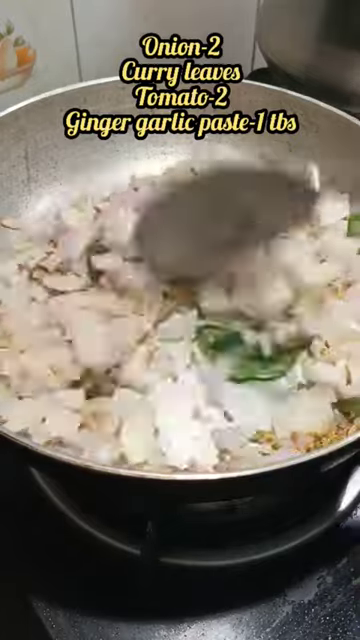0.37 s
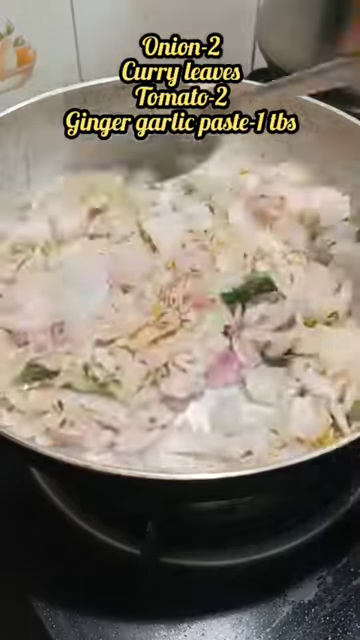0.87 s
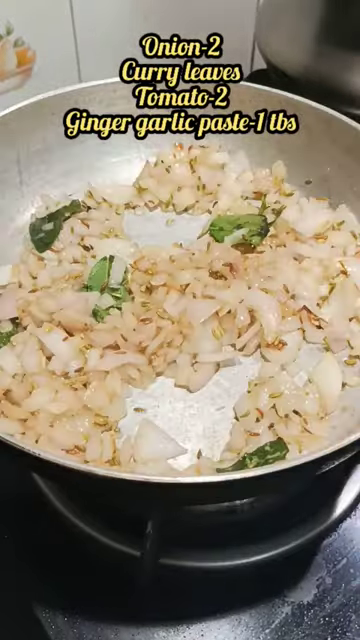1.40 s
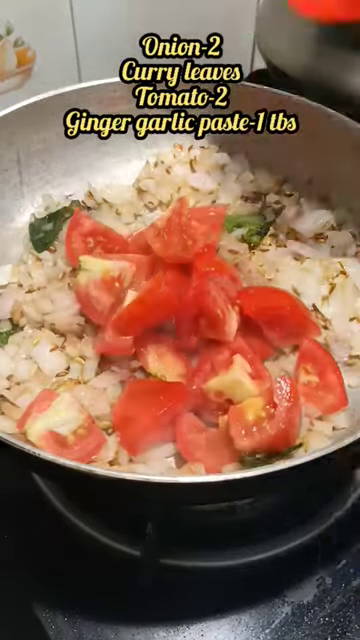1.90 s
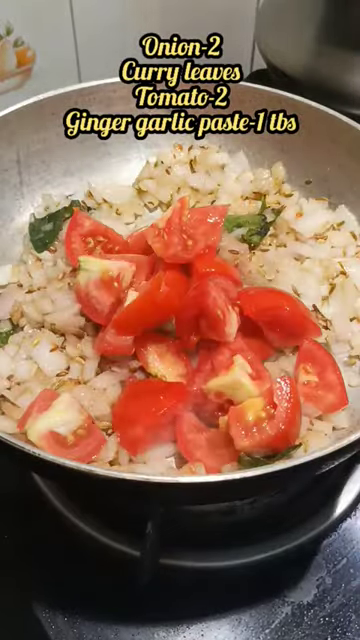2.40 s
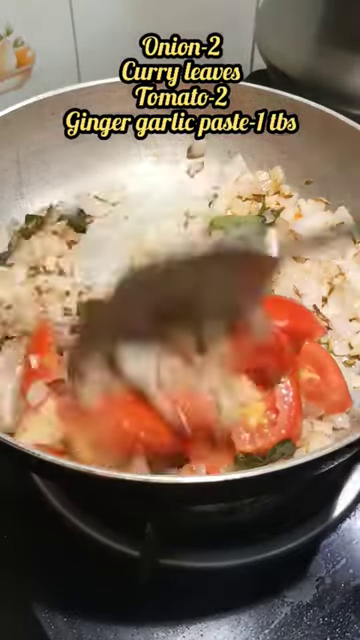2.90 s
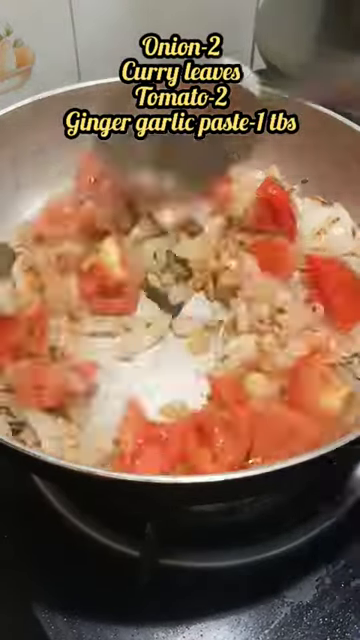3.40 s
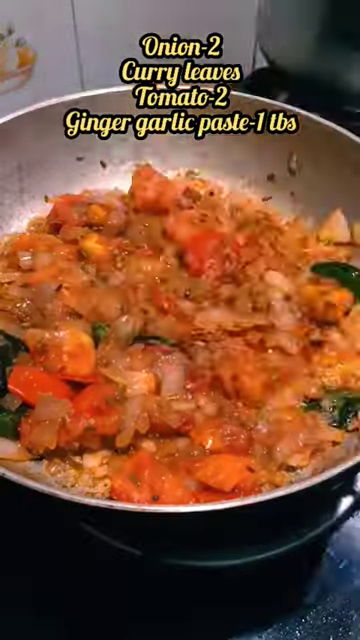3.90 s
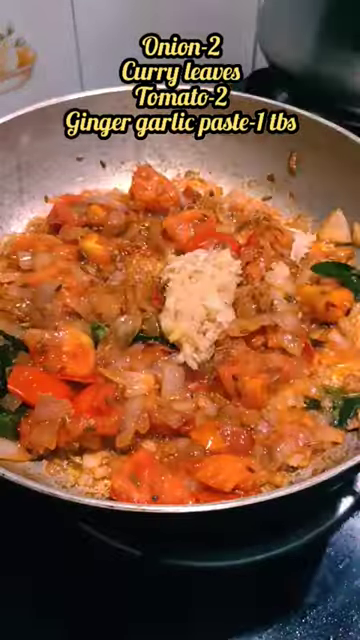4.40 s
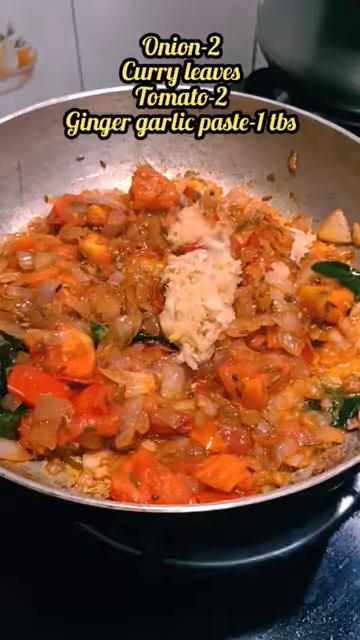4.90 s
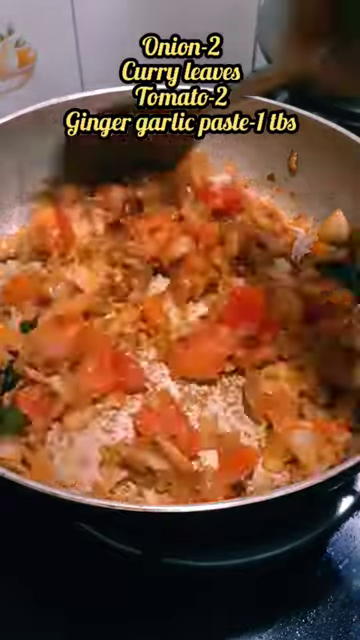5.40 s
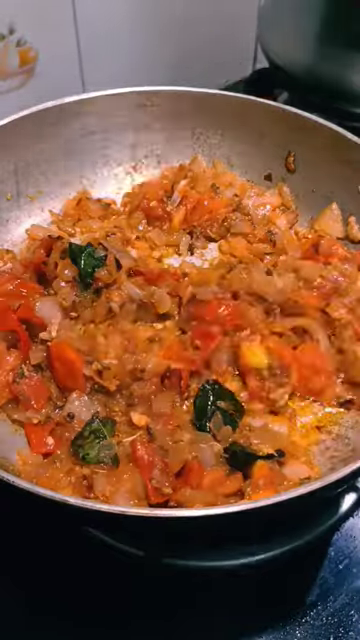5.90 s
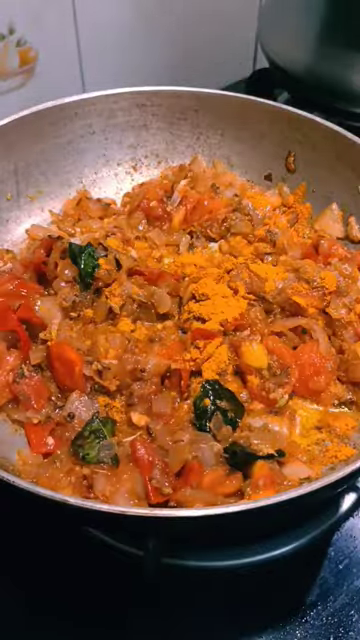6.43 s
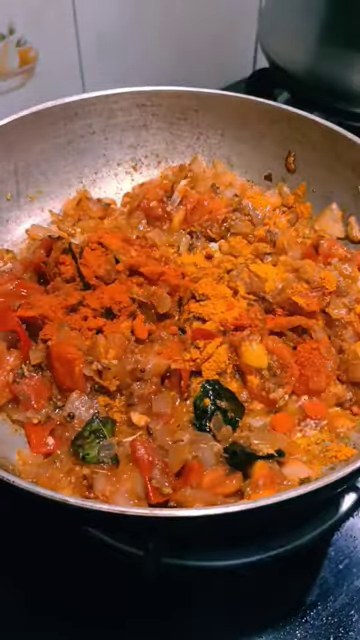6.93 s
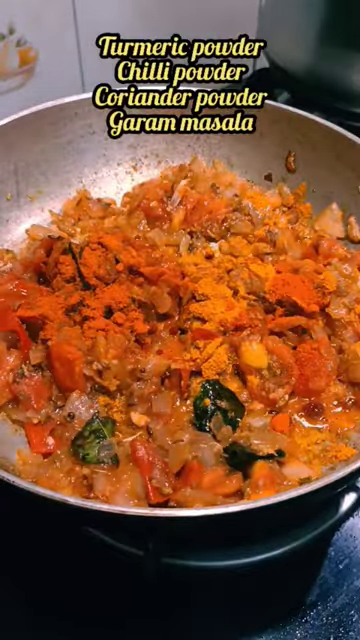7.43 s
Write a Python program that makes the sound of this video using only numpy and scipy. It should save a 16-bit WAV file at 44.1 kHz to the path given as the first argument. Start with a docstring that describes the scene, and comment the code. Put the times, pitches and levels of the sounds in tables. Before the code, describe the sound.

A ladle knocks and scrapes a steel pan of frying onions over a lively sizzle that jumps abruptly between loud and quiet stages.

```python
"""Onions and tomatoes frying in a steel pan

Steam bubbles burst in the oil as a dense sizzle of shaped noise bursts, with lone decaying-sine pops and spits.
A ladle knocks, scrapes and stirs the pan, waking modes that hold and then stop abruptly; a small spoon clinks
in bright modes and steam whistles faintly in a gliding sine. Burner and kitchen rumble as low noise. The sizzle
jumps abruptly in fierceness several times; the sound is in stereo, and twice its level dips briefly."""
import sys
import numpy as np
from scipy import signal
from scipy.fft import rfft, irfft, next_fast_len
from scipy.io import wavfile
from scipy.ndimage import uniform_filter1d

SR = 44100
rng = np.random.default_rng(int(sys.argv[2]) if len(sys.argv) > 2 else 0)


def convert_level_to_amplitude(level_db):
    """Map a level in decibels to its linear amplitude factor."""
    exponent = np.asarray(level_db, float) / 20
    return 10 ** exponent


def dump(signal):
    """Clip the signal to [-1, 1] and save it as 16-bit WAV at the path in sys.argv[1]."""
    limited = np.clip(np.atleast_2d(signal).T, -1, 1)
    pcm = np.round(limited * 32767).astype(np.int16)
    wavfile.write(sys.argv[1], SR, pcm)


N = 332955
SIZE = next_fast_len(N + 4096)  # transform length, samples
HZ = np.arange(SIZE // 2 + 1) * SR / SIZE + 1e-3  # kept above zero for the logarithm

# The pan's modes.
# Each row: frequency in Hz, level in dB, time to fall 60 dB in seconds (shorter after a quick contact).
PAN_MODES = [(165, -12.5, 0.021), (270, -5, 0.051), (314, 4, .018), (384, -2.5, 0.027), (529, -8, 0.021),
             (604, -0.5, 0.025), (689, 3, 0.025), (760, -1.5, 0.027), (935, 1, 0.02), (1010, 7, .02),
             (1083, -0.5, .021), (1224, 0.5, .028), (1377, -5.5, 0.02), (1540, 4.5, 0.026),
             (1760, 8.5, 0.016), (2177, 4, 0.026), (2373, 4, 0.013), (2600, 6.5, 0.023)]
EDGE_FROM_HZ = 1150  # the pan's high edge rings lie above this


def read(table, col=1):
    """Spectral interpolation: a table column along a log-frequency axis."""
    return np.interp(np.log(HZ), np.log([r[0] for r in table]), [r[col] for r in table])


def colour(x, table):
    """Linear filtering: two signals take on a spectrum and a common rms of 1."""
    y = irfft(rfft(x, SIZE) * convert_level_to_amplitude(read(table)), SIZE)[:, :N]
    return y / np.sqrt(np.mean(y ** 2))


def walk(rate):
    """Random modulation: independent levels held for 1 / rate seconds, then smoothed twice."""
    k = int(SR / rate)
    held = np.repeat(rng.standard_normal(N // k + 1), k)
    return 0.93 * uniform_filter1d(uniform_filter1d(held, k), k)[:N]


def add(track, s, sound):
    """Superposition: a sound joins a track at s seconds."""
    i = int(s * SR)
    track[:, i:i + sound.shape[-1]] += sound[..., :N - i]


def stage(col):
    """Piecewise-constant bubble size: bigger bubbles in wetter food make a duller fizz."""
    # Each row: end in seconds, tilt in dB per octave about 6 kHz, extra wet crackle in dB.
    stages = [(1.3, -2.5, 0.5), (1.945, 0, 0.2), (2.98, -1, 1.1), (3.89, -1.5, 1), (5.1, -1.1, 0.6),
              (5.7, -1.1, 0.5), (7.55, 0.6, 0.2)]
    rows = np.array(stages)
    row = np.searchsorted(rows[:, 0], np.arange(N) / SR)
    return rows[np.minimum(row, len(rows) - 1), col]


def flicker(x, own_db):
    """Band-wise modulation: half-octave bands flicker fast and independently, and tilt with the stage."""
    bands_hz = 2000 * 2 ** np.arange(0, 3.1, .5)
    lean = stage(col=1)
    spectrum = rfft(x, SIZE)
    octave = np.log2(np.clip(HZ, bands_hz[0], bands_hz[-1]))
    out = 0
    for hz in bands_hz:
        share = np.clip(1 - 2 * abs(octave - np.log2(hz)), 0, 1)  # neighbours overlap and sum to one
        band = irfft(spectrum * share, SIZE)[:, :N]
        out = out + convert_level_to_amplitude(own_db * walk(45) + lean * np.log2(hz / 6000)) * band
    return out


def bubbles(spread_db, most_db, burst_ms, patchy_db, table):
    """Shot noise: bursts of very unequal size reach both tracks, each with its own fine detail."""
    hold = max(int(burst_ms * SR / 1000), 1)
    draws = np.repeat(rng.exponential(size=N), hold)[:N]
    size = convert_level_to_amplitude(np.minimum(spread_db * draws, most_db))
    patches = convert_level_to_amplitude(patchy_db * walk(60) + 0.73 * patchy_db * walk(35))
    return colour(size * patches * rng.standard_normal((2, N)), table)


def sizzle():
    """Event density: small bubbles fizz high, wet ones crackle lower, and fierce frying blends single bursts."""
    # Spectra of fizz and crackle. Each row: frequency in Hz, relative density in dB per Hz.
    fizz_spectrum = [(300, -39), (1500, -16), (3200, -2.5), (5500, -5.5), (8500, -5), (11000, 1),
                     (13000, -5.5), (15000, -9.5), (16000, -45)]
    crackle_spectrum = [(150, -9), (500, -16), (1000, 1), (1300, -1.5), (1750, 3.5), (2250, 0),
                        (3200, -0.5), (5000, -6.5), (9000, -24), (16000, -35)]
    # Fierceness; it also swells when the food is turned. Each row: time in seconds, fine fizz level in dB.
    fierceness = [(0, -24.5), (.55, -24), (1.288, -25.5), (1.31, -32), (1.5, -35.5), (1.94, -38),
                  (1.952, -27), (2.0, -23.5), (2.08, -26.5), (2.4, -28.5), (2.48, -26), (2.95, -28),
                  (3.04, -22), (3.883, -21.5), (3.915, -39.5), (4.78, -37.5), (5.09, -39), (5.122, -38),
                  (5.134, -31.5), (5.2, -28), (5.57, -23.5), (5.696, -26.5), (5.707, -44.5), (7.55, -46)]
    middling_db = -34
    wet_db, wet_per_db = -38.5, 0.5136  # crackle under a middling fizz; dB gained for each dB of fizz
    fizz_db = np.interp(np.arange(N) / SR, *np.transpose(fierceness))
    over_db = fizz_db - middling_db
    fizz = bubbles(spread_db=2.0 - 0.024 * over_db, most_db=11.5 - 0.53 * over_db, burst_ms=.25,
                   patchy_db=1.26, table=fizz_spectrum)
    wet = bubbles(spread_db=1.5, most_db=2.5, burst_ms=.8, patchy_db=1.5, table=crackle_spectrum)
    wet_gain = convert_level_to_amplitude(wet_db + wet_per_db * over_db + stage(col=2))
    return convert_level_to_amplitude(fizz_db) * flicker(fizz, own_db=1.73) + wet_gain * wet


def rumble():
    """Low-frequency random noise: burner and kitchen, lumpy and slowly wavering."""
    # Each row: frequency in Hz, relative density in dB per Hz.
    rumble_spectrum = [(25, -20), (70, -2), (130, -0.5), (230, 2), (300, -6.5), (600, -6), (1200, -11.5),
                       (4000, -22.5)]
    # Each row: time in seconds, level in dB.
    rumble_levels = [(0, -43.5), (1.2, -41), (2.6, -41), (3.8, -41), (4.3, -40.5), (4.9, -39.5),
                     (5.9, -41.5), (6.4, -42.5), (7.0, -43), (7.55, -42.5)]
    db = np.interp(np.arange(N) / SR, *np.transpose(rumble_levels)) + 1.2 * walk(14) + 1.0 * walk(5.5)
    return convert_level_to_amplitude(db) * colour(rng.standard_normal((2, N)), rumble_spectrum)


def spatter():
    """Random impulses: spits of oil and low plops of sauce, each rising a little in pitch as it bursts."""
    # Each row: bursts per second, level of the smallest in dB, spread in dB, lowest and highest starting
    # pitch in Hz, cycles to fall to 1/e.
    spits = [(30, -42, 6, 7300, 13500, 2), (14, -47, 3.5, 218, 820, 2.9)]
    out, t = np.zeros((2, N)), np.arange(1500) / SR
    for rate, db, spread_db, low_hz, high_hz, cycles in spits:
        for when, size, pitch in rng.random((400, 3))[:int(rate * N / SR)]:
            turns = low_hz * (high_hz / low_hz) ** pitch * t
            rising = turns * (1 + 0.017 * np.minimum(turns, 8))
            burst = np.sin(2 * np.pi * rising) * np.exp(-turns / cycles)
            burst_db = db - spread_db * np.log(1 - .97 * size)  # few large, many small
            add(out, when * N / SR, convert_level_to_amplitude(burst_db) * burst[None])
    return out


def stirring():
    """Forced resonance: the ladle's uneven drag through the food shakes the pan's lower modes at once."""
    # Each row: start in seconds, end in seconds, level in dB.
    strokes = [(0, 1.283, -46.5), (2.938, 3.874, -43), (5.11, 5.705, -47.5)]
    fade_s, uneven_db = 0.022, 4
    t = np.arange(N) / SR
    response = sum(convert_level_to_amplitude(db) / (1 + 1j * (HZ - hz) * 2 * np.pi * t60 / np.log(1000))
                   for hz, db, t60 in PAN_MODES if hz < EDGE_FROM_HZ)
    force = convert_level_to_amplitude(uneven_db * walk(30.06)) * rng.standard_normal((2, N))
    murmur = irfft(rfft(force, SIZE) * response, SIZE)[:, :N]
    drag = sum(convert_level_to_amplitude(db) * np.clip(np.minimum(t - start, end - t) / fade_s, 0, 1) for start, end, db in strokes)
    return drag * murmur / np.sqrt(np.mean(murmur ** 2))


def scrapes():
    """Stick-slip friction: steel or food dragged along the pan gives band noise that swells and stops."""
    # Each row: start in seconds, length in seconds, level in dB, centre in Hz, width in octaves.
    drags = [(0.032, 0.055, -28, 700, 2.1), (0.179, 0.034, -31.5, 700, 1.7),
             (0.316, 0.023, -27.5, 895, 2.2), (0.563, 0.026, -35, 600, 3.5), (0.795, 0.034, -45, 400, 1.3),
             (0.841, 0.041, -34, 600, 2.2), (0.947, 0.031, -29.5, 700, 1.6), (1.15, 0.022, -28, 605, 3.3),
             (1.467, 0.055, -39.5, 800, 1.8), (1.506, 0.015, -27, 2300, 1), (1.521, 0.023, -34, 1190, 2),
             (2.036, 0.046, -39, 1720, 0.36), (2.24, .03, -45, 1600, .5), (2.38, 0.039, -37, 1620, 0.33),
             (2.493, 0.044, -34, 1720, 0.43), (2.617, .04, -36, 1650, .5), (2.181, .02, -33.5, 1090, 2.9),
             (2.533, 0.013, -33, 900, 1.6), (2.564, 0.025, -34, 1000, 1.7), (2.933, 0.016, -32, 840, 1.2),
             (3.055, .035, -40, 550, 1.4), (3.127, 0.023, -38, 317, 0.64), (3.271, 0.033, -26, 790, 1.1),
             (4.952, 0.04, -33, 2120, 0.44), (4.991, 0.023, -31, 1200, 2.1), (6.972, 0.091, -57, 400, 1.1),
             (5.215, .03, -41, 960, 0.41), (5.26, 0.037, -41, 1000, 0.46), (5.348, 0.0093, -33, 1800, 1),
             (5.505, 0.051, -34.5, 604, 1.6), (5.788, 0.21, -47, 427, 0.8)]
    uneven_db = 3.5
    out = np.zeros((2, N))
    for s, length, db, hz, octaves in drags:
        t = np.arange(int(length * SR)) / SR
        edges_hz = hz * 2 ** (np.array([-.5, .5]) * octaves)
        band = signal.butter(3, edges_hz, "band", fs=SR, output="sos")
        uneven = convert_level_to_amplitude(uneven_db * np.interp(t, np.arange(60) * 0.00425, rng.standard_normal(60)))
        grit = signal.sosfilt(band, rng.standard_normal((2, 12000)))[:, 500:500 + len(t)]  # past the onset
        grit = grit / np.sqrt(np.mean(grit ** 2))
        add(out, s, convert_level_to_amplitude(db) * np.sqrt(np.sin(np.pi * t / length)) * uneven * grit)
    return out


def hold_and_stop(t60, rise_ms):
    """Amplitude envelope: sound builds up, holds, then stops abruptly, as in time-stretched, sped-up sound."""
    t, rise = np.arange(2600) / SR, max(rise_ms, .1) / 1000
    build_up = np.sin(np.pi / 2 * np.minimum(t / rise, 1)) ** 2
    stop = np.exp(-np.log(1000) * (np.maximum(t - rise, 0) / t60) ** 2.45)
    return t, build_up * stop


def ring(hz, t60, rise_ms, rough=.5):
    """Modal vibration shaken by a chattering contact; the right channel's own part trails by a quarter cycle."""
    scatter_turns, soft_scatter_turns = .04, .35  # phase scatter of the lag; of a soft contact
    t, shape = hold_and_stop(t60, rise_ms)
    start = soft_scatter_turns * rng.random() * min(rise_ms / 3.3, 1)
    turns = start + np.array([[0], [-.25 + scatter_turns * rng.standard_normal()]])
    chatter = 1 + rough * np.interp(t, np.arange(30) * 0.00211, rng.standard_normal(30))
    return shape * chatter * np.sin(2 * np.pi * (hz * t + turns))


def ladle():
    """Modal excitation: each contact grates and wakes modes near its favoured pitch, the boom and edge rings."""
    # Ladle and pieces of food meeting the pan. Each row: start in seconds, peak in dB, pitch in Hz that
    # the struck spot favours, low boom against that pitch in dB, build-up in milliseconds.
    knocks = [(.034, -17.5, 874, -10, 3.8), (.045, -11, 760, -17, 4.7), (.058, -11.5, 960, -17, 5.6),
              (.068, -20, 1010, -17, 7.7), (0.181, -18, 1050, -1, 3.5), (.195, -21, 384, -12, 3.1),
              (0.269, -19.5, 896, -15, 6.7), (0.283, -19.5, 1020, -2, 5), (.317, -10, 1010, -13, 2.7),
              (.318, -15, 1700, -24, 2), (.323, -13, 1780, -22, 3.2), (.329, -18, 1150, -13, 2.9),
              (0.363, -16.5, 597, -1, 2.1), (.374, 1.5, 1023, -19.5, 1.4), (.568, -7, 1050, -18, 7),
              (0.586, -17, 1080, -15, 4), (.662, -16.5, 1084, -8, 10.6), (0.716, -32, 380, -13, 5.8),
              (0.761, -6, 850, 1, 0.11), (0.799, -25, 690, -4, 5), (0.814, -26.5, 380, -14, 6.8),
              (0.84, -11, 1050, -20.5, 3), (.84, -21, 617, -16, 6.2), (.853, -19.5, 617, -7, 6.3),
              (.857, -18, 1050, -20, 5), (0.879, -17.5, 790, -7, 2.7), (0.892, -23, 856, -8, 3.2),
              (0.95, -18, 700, -16, .8), (.955, -24, 1010, -25, 5), (.967, -26, 1010, -25, 5),
              (0.962, -19.5, 628, -17, 7.1), (.977, -21, 990, -25, 7.4), (1.047, -23, 940, -27, 4.4),
              (1.057, -9, 904, -17.5, 1.9), (1.088, -34, 314, -9, 6.1), (1.151, -14.5, 1010, 2, 8.3),
              (1.167, -22, 1010, -6, 2.3), (1.278, -23.5, 700, -3, 2.3), (1.506, -14, 1490, -12, 1.7),
              (1.507, -18.5, 860, -17, 2.3), (1.508, -18, 2600, -28, 3), (1.511, -17, 1330, -22, 2.3),
              (1.941, -34, 1540, -30, 8), (2.185, -22, 1330, -25, 5.5), (2.536, -24, 1083, -2, 2),
              (2.568, -23, 1430, -12, 3), (2.936, -18, 582, -18, 5.5), (2.94, -20, 935, -9, 4),
              (2.946, -19, 594, -6, 3.2), (2.949, -27, 1000, -3, 3), (3.054, -31, 314, -11, 8.4),
              (3.072, -25, 760, -12, 5), (3.129, -25, 314, -10, 5.4), (3.278, -9.5, 760, -11.5, 4.5),
              (3.28, -17, 1020, -11, 3.5), (3.292, -16.5, 650, -6, 5.5), (3.31, -24, 1050, -2, 5),
              (3.369, -15, 1050, 0, 6.7), (3.386, -19, 1050, 0, 3.8), (3.766, -20, 830, -16, 4.6),
              (4.813, -24.5, 165, -22, 7.2), (4.992, -25, 1320, -25, 6), (4.996, -31, 760, -19, 5),
              (4.998, -21, 524, -24, 5), (5.234, -22.5, 330, -4, 3.2), (5.353, -5, 935, -20, 1),
              (5.3525, -13.5, 1760, -25, 1.5), (5.3535, -12, 640, -21, 1.2), (5.379, -20, 810, -13, 3.2),
              (5.428, -20.5, 1095, -14, 6.1), (5.51, -22, 770, -6, 5.7), (5.53, -25.5, 597, -4, 10),
              (5.541, -27, 450, -4, 4), (5.665, -13.5, 950, -13, .22), (5.793, -33, 314, 0, 3.9),
              (5.841, -33, 516, -3, 4.8), (5.89, -34, 500, 6, 8.1), (6.486, -34, 165, -18, 6),
              (6.975, -29.5, 167, -33, 6.3), (7.024, -30.5, 314, -1, 5.2), (7.351, -36, 270, -4, 4.1)]
    boom_top_hz = 450
    edge_offset_db, edge_db_per_octave = -5.5, 5.5  # edge against boom at 1 kHz; higher spots wake it more
    sharp_db_per_halving, usual_ms = 4, 3.4  # a quicker contact is harder and wakes the edge rings more
    pull = .8  # how far the weight of food and ladle drags a woken mode towards the favoured pitch
    steel_on_steel = signal.butter(2, (380, 2800), "band", fs=SR, output="sos")
    out = np.zeros((2, N))
    for s, db, spot_hz, boom_db, ms in knocks:
        edge_db = boom_db + edge_offset_db + edge_db_per_octave * np.log2(spot_hz / 1000)
        edge_db = edge_db + sharp_db_per_halving * np.log2(usual_ms / max(ms, .8))
        lasting = np.clip(ms / 1.03, .2, 1)  # a glancing tick hardly sets the pan ringing
        t, shape = hold_and_stop(0.033 * lasting, ms)
        grating = signal.sosfilt(steel_on_steel, rng.standard_normal((2, len(t))))
        sound = convert_level_to_amplitude(0.64 * edge_db + 9) * shape * grating
        for hz, mode_db, t60 in PAN_MODES:
            near_db = -170 * abs(np.log(hz / spot_hz)) ** 1.3
            if hz < boom_top_hz:
                least_db = boom_db
            elif hz > EDGE_FROM_HZ:
                least_db = edge_db
            else:
                least_db = 0.5 * edge_db - 5.5
            detune = (spot_hz / hz) ** (pull * convert_level_to_amplitude(near_db / 2)) + 0.0082 * rng.standard_normal()
            level_db = mode_db + max(near_db, least_db) + rng.standard_normal()
            sound = sound + convert_level_to_amplitude(level_db) * ring(hz * detune, t60 * lasting, ms, rough=0.18)
        add(out, s, convert_level_to_amplitude(db) * sound / np.abs(sound[0]).max())
    return out


def pops():
    """Bubble resonance: a few decaying cycles at one pitch, then a spray of droplets around that pitch."""
    # Lone bursts in the oil. Each row: start in seconds, level in dB, pitch in Hz.
    bursts = [(3.965, -22, 7000), (3.987, -20.5, 8350), (4.101, -13.5, 11500), (4.108, -25, 11500),
              (4.1785, -18, 7950), (4.361, -23, 11000), (4.528, -27, 12000), (4.583, -30, 11500),
              (4.6194, -25, 8100), (4.6394, -32, 9000), (4.657, -22, 6500), (4.714, -25, 7500),
              (4.802, -18, 10800), (4.83, -26, 7500), (4.8493, -27, 8410), (5.0968, -20.5, 10400),
              (5.7324, -26, 10900), (5.914, -17, 11000), (5.9333, -21, 11500), (6.1494, -24, 11100),
              (6.2, -19, 10500), (6.243, -26, 9400), (6.3055, -24, 8300), (6.447, -18, 9500),
              (6.594, -31, 9000), (6.641, -23, 8700), (6.7345, -20, 11000), (6.754, -24, 10500),
              (6.8795, -31, 7420), (7.1226, -34, 7710), (7.3637, -30, 7870), (7.4684, -41, 7670)]
    cycles, spray_db, spray_ms = 2.2, -21, 1.4  # cycles and milliseconds to fall to 1/e
    out, t = np.zeros((2, N)), np.arange(400) / SR
    for s, db, hz in bursts:
        droplets = uniform_filter1d(rng.standard_normal((2, 400)), size=3)
        spray = convert_level_to_amplitude(spray_db) * droplets * np.exp(-1000 * t / spray_ms)
        add(out, s, convert_level_to_amplitude(db) * np.sin(2 * np.pi * hz * t) * (np.exp(-t * hz / cycles) + spray))
    return out


def whistle():
    """Jet tone: steam squeezing out makes a faint breathy line that rises as the gap narrows."""
    # Each row: time in seconds, pitch in Hz, level in dB.
    steam_line = [(4.2, 8300, -60), (4.29, 8600, -51), (4.37, 9050, -49.5), (4.43, 9950, -46),
                  (4.5, 10250, -46), (4.56, 10700, -50), (4.6, 11000, -60)]
    jitter = .018  # share of the pitch
    s, hz, db = np.transpose(steam_line)
    t = np.arange(N) / SR
    pitch = np.interp(t, s, hz) * (1 + jitter * walk(400))
    phase = 2 * np.pi * np.cumsum(pitch) / SR
    sounding = (t > s[0]) * (t < s[-1])
    return convert_level_to_amplitude(np.interp(t, s, db) + 2.5 * walk(79)) * sounding * np.sin(phase)


def spoon():
    """Free modal vibration: short bright rings of a small steel spoon."""
    # Each row: frequency in Hz, level in dB, time to fall 60 dB in seconds.
    spoon_modes = [(7390, -8, 0.018), (8240, -6.5, 0.021), (11500, -4, 0.034), (12000, -5, .04),
                   (12930, 2, 0.046)]
    # Each row: start in seconds, level in dB, extra dB for the modes over 10 kHz.
    clinks = [(4.774, -29.5, -14), (7.096, -38, -6), (7.322, -33.5, -4), (7.332, -38, -1)]
    out = np.zeros((2, N))
    for s, db, top_db in clinks:
        add(out, s, sum(convert_level_to_amplitude(db + mode_db + top_db * (hz > 1e4)) * ring(hz, t60, 1.4, rough=.15)
                        for hz, mode_db, t60 in spoon_modes))
    return out


def scene():
    """Superposition of all sources: row 0 reaches both channels, row 1 is what only the right one has."""
    steady = sizzle() + rumble() + spatter() + stirring()
    return steady + scrapes() + ladle() + pops() + whistle() + spoon()


def duck(x, top_db, ratio, window_ms):
    """Dynamic range compression that looks ahead: loud knocks pull everything down for a moment."""
    k = int(window_ms * SR / 1000)
    level = np.sqrt(uniform_filter1d(np.mean(x ** 2, axis=0), k) + 1e-12)
    return x * np.minimum(convert_level_to_amplitude(top_db) / level, 1) ** (1 - 1 / ratio)


def roll_off(x):
    """The treble ends steeply here."""
    return signal.sosfilt(signal.butter(12, 16320, fs=SR, output="sos"), x)


def record(dry):
    """Partial coherence: the right channel has its own colour, and a lag below about 6.5 kHz; two level dips."""
    # Steep cut of the highest treble. Each row: frequency in Hz, level in dB.
    top_cut = [(15200, 0), (15750, -42)]
    # Right channel against left; the treble above about 6.5 kHz stays in step (whole turns of phase).
    # Each row: frequency in Hz, level in dB, likeness from 0 to 1, phase lag in radians.
    right_against_left = [(30, -12.5, 0.4, 1.5), (118, -3.5, 0.8, 0), (350, -2.5, 0.9, 0.5),
                          (700, -1, 0.58, 0.2), (1050, -1.5, 0.45, 2), (1700, -4.5, 0.5, 1.5),
                          (2590, -2.5, 0.41, 4.5), (4500, -2.5, 0.09, 2), (5980, -1.5, 0.17, 7.5),
                          (6500, 2, 0.01, 2 * np.pi), (7640, 9, 1, 2 * np.pi), (8650, 0.5, 0.7, 2 * np.pi),
                          (10330, -8, 0.55, 2 * np.pi), (12000, -14.5, 0.4, 2 * np.pi),
                          (12500, -21, .12, 2 * np.pi), (14700, -8, .12, 2 * np.pi),
                          (15800, -18, 0.2, 2 * np.pi)]
    # Each row: drop in seconds, return in seconds, fade-in in seconds.
    dropouts = [(1.293, 1.3, 0.015), (3.885, 3.899, 0.03)]
    both, own = rfft(dry, SIZE) * convert_level_to_amplitude(read(top_cut))
    like = np.clip(read(right_against_left, col=2), 0, 1)
    lagged = np.exp(-1j * read(right_against_left, col=3)) * both
    right = convert_level_to_amplitude(read(right_against_left)) * (like * lagged + np.sqrt(1 - like ** 2) * own)
    stereo = irfft([both, right], SIZE)[:, :N]
    t, gain = np.arange(N) / SR, 1
    for out, back, fade in dropouts:
        gain = gain * np.interp(t, [out - .003, out, back, back + fade], [0.98, 0.028, 0.012, 1.0])
    return roll_off(gain * duck(stereo, top_db=-24.0, ratio=1.65, window_ms=10.7))


dry = scene()
out = record(dry)
dump(out)
```